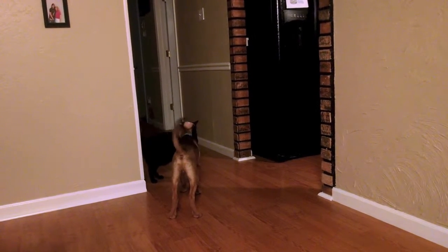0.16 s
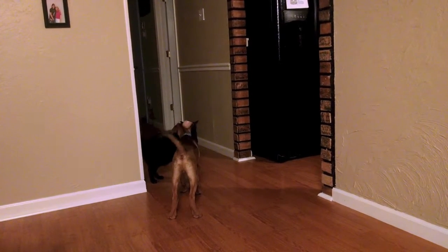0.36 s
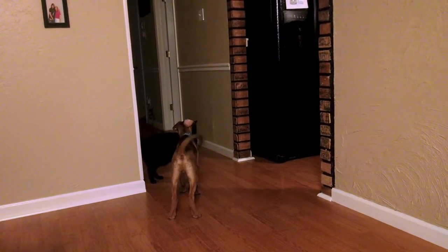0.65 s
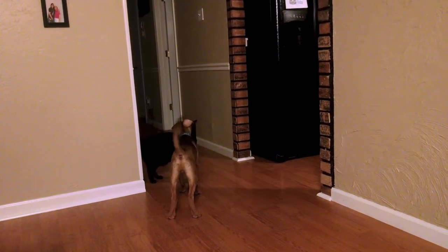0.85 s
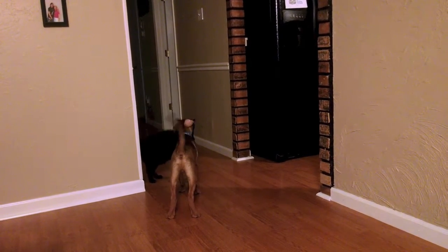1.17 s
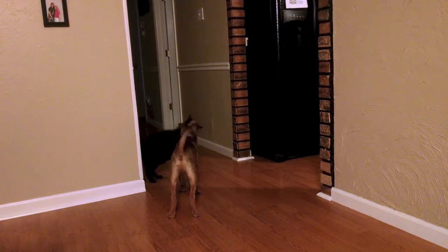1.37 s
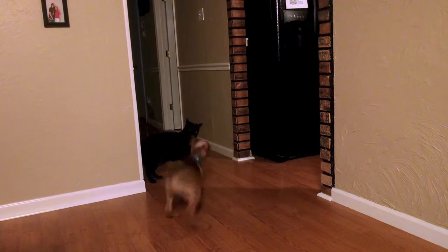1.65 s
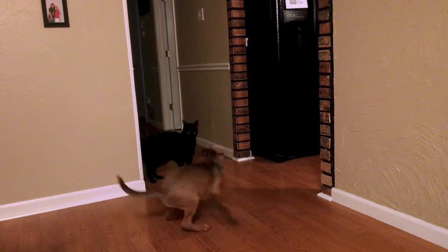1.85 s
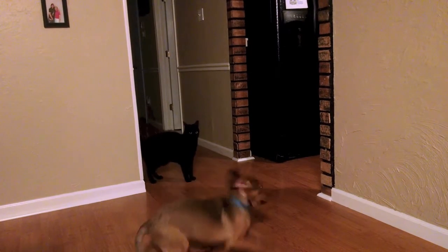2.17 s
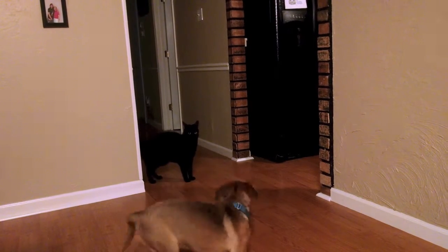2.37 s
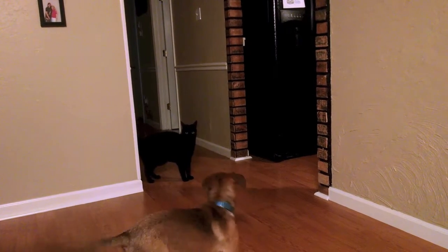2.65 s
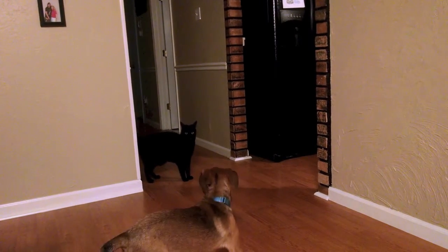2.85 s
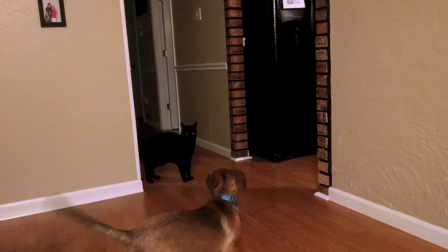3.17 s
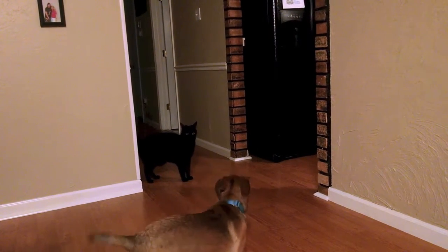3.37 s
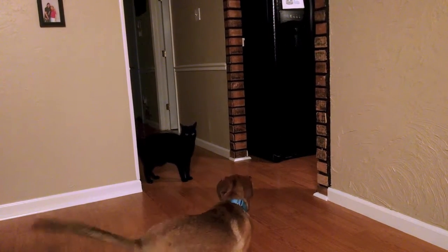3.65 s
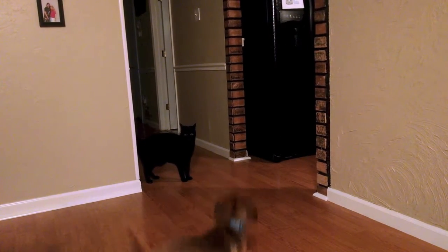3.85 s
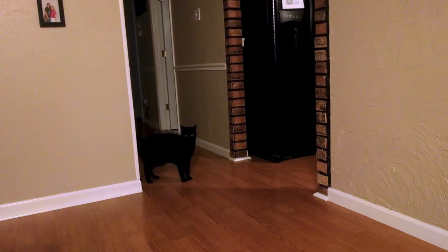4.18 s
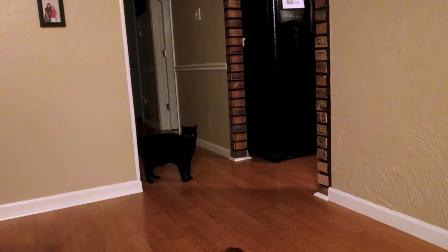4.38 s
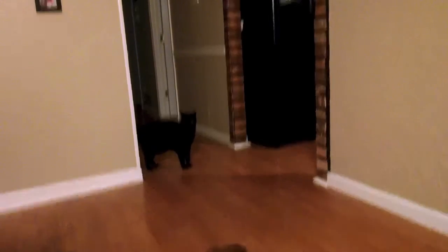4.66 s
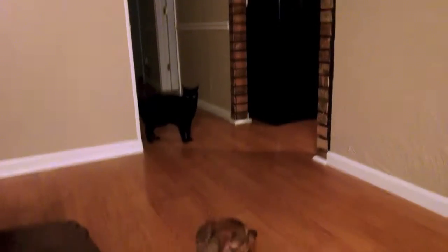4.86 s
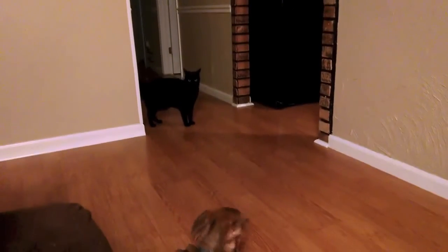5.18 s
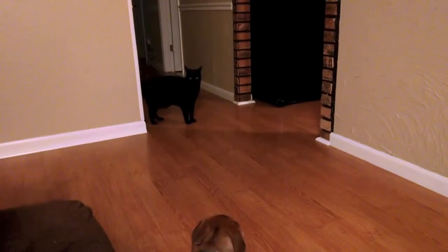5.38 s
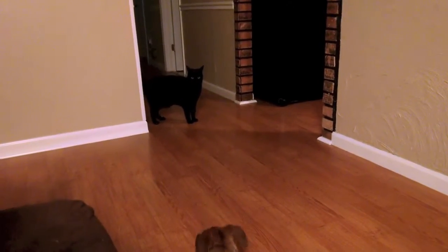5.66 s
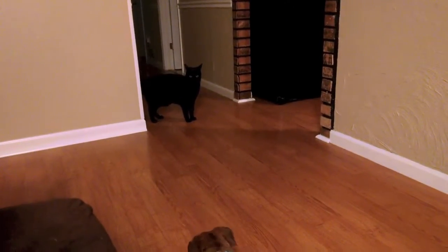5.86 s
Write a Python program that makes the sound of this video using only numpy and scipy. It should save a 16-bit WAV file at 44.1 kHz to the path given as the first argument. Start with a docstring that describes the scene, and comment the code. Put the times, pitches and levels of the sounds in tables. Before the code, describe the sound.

A puppy gives short yips and thin whimpers, a cat hisses once, and paws skid and thump on a hardwood floor.

```python
"""In a bare, lively room with a hardwood floor, a puppy yips and whistles through its nose at a cat.
The yips are short, rough tones shaped by its throat; the whistles are thin and very high. The cat
hisses once from the hall, pushing air and a hoarse buzz through its open mouth. Paws skid, claws tick
and the puppy's body thumps on the boards, while an appliance hums. A phone picks it all up through
two microphone ports (small holes) and steers them into a left and a right beam."""
import sys
import numpy as np
from scipy import signal
from scipy.fft import rfft, irfft, next_fast_len
from scipy.io import wavfile
from scipy.ndimage import map_coordinates

SR = 44100
rng = np.random.default_rng(int(sys.argv[2]) if len(sys.argv) > 2 else 0)


def store_wav(level_fs):
    """Save 16-bit WAV to argv[1]."""
    pcm = np.round(np.clip(np.atleast_2d(level_fs), -1, 1) * 32767)
    wavfile.write(sys.argv[1], SR, pcm.T.astype(np.int16))


N = 265046

# The puppy's yips. A peak_share of 0.3 means the swell tops out 30% of the way through.
# start_s, length_s, first_hz, last_hz, glide_s, level_db, peak_share, tilt_db_per_octave, roughness
PUPPY_YIPS = [(1.805, 0.027, 620, 620, .05, -46.5, 0.3, -21, 0.1),
              (1.848, 0.034, 575, 627, 0.023, -37, 0.38, -7.5, 0.27),
              (2.262, 0.04, 495.4, 510, 0.045, -34.5, .25, -11.5, 0.4),
              (2.3, 0.026, 654, 590, .05, -36, 0.12, -12, 0.44),
              (2.343, 0.036, 628, 655, .05, -44.5, 0.74, -22, .3),
              (2.555, 0.031, 399.6, 385, .05, -34.5, 0.49, -10.5, 0.27),
              (2.589, 0.039, 404.8, 412, .05, -38, 0.45, -18, 0.44),
              (3.156, 0.084, 821, 870, .05, -45.5, .05, -10, 0.26),
              (3.275, 0.05, 748, 586, .03, -48, 0.1, -16, .9),
              (3.477, 0.036, 731, 810, .025, -42, 0.5, -6.5, .5),
              (3.51, 0.029, 821, 852, .02, -36, .45, -11, 0.26),
              (3.546, 0.051, 794, 603, .05, -44, 0.25, -10, 0.61),
              (3.65, 0.065, 829, 856, .05, -54, 0.52, -20, 0.2),
              (3.836, 0.036, 771, 660, .025, -38.5, 0.58, -8.5, 0.46),
              (3.867, 0.029, 720, 834, .015, -33.5, .55, -9, .35),
              (3.897, .055, 850, 885, .04, -44.5, 0.43, -11, 0.78),
              (3.957, 0.0446, 1215, 1240, .05, -38.5, 0.3, -39, 0.18),
              (4.411, .052, 330, 660, .2, -35, .7, -5, .3), (4.46, 0.048, 649, 890, .035, -36, .65, -9, .4),
              (4.505, 0.085, 886, 955.5, .03, -27, 0.37, -15, .22),
              (4.604, 0.088, 819, 816, .05, -42.5, 0.17, -27, 0.47),
              (5.2, .047, 754, 925, 0.045, -37, 0.47, -6.5, .18),
              (5.243, 0.056, 914, 958, .015, -30, 0.38, -11.5, 0.23),
              (5.297, .026, 948, 1003, 0.02, -36, 0.68, -11, 0.48),
              (5.322, 0.031, 990, 845, .02, -33, .3, -6, .3),
              (5.35, 0.082, 844, 838.5, .015, -41, 0.3, -3.5, 0.11),
              (5.434, 0.066, 843.3, 843, .05, -34, 0.16, -6.5, 0.09),
              (5.53, 0.044, 830, 826.3, .05, -47.5, .4, -8.5, 0.01),
              (5.8, 0.044, 779, 805, 0.045, -38, 0.19, -18.5, 0),
              (5.852, 0.032, 820, 828, .05, -46, 0.72, -24, 0.36)]
# How the throat favours some overtones: frequency_hz, gain_db
THROAT_SHAPE = [(300, -1.5), (900, 4), (1700, -2), (2450, 11), (2850, 10.5), (3400, 10), (4200, 3),
                (5200, 3), (5850, 14), (6600, 4), (10000, -22)]
# Nose whistles: start_s, length_s, first_hz, last_hz, glide_s, level_db, peak_share, octave_gain_db
NOSE_WHISTLES = [(2.322, 0.087, 6200, 6080, .02, -32.5, 0.079, -22),
                 (3.195, 0.026, 6130, 6100, .02, -53, 0.77, -28),
                 (3.224, 0.09, 6040, 5900, .03, -52, .55, -9),
                 (3.901, 0.032, 5720, 5400, .014, -27, 0.39, -29),
                 (3.93, 0.061, 5354, 5410, .03, -25, 0.65, -29),
                 (3.979, 0.1, 5660, 5540, .09, -24, 0.45, -27),
                 (4.524, 0.027, 6530, 6650, .015, -36, 0.81, -23),
                 (4.589, 0.018, 6690, 6680, .03, -36, 0.4, -31),
                 (4.6, 0.036, 6650, 5780, .016, -30.5, 0.45, -31),
                 (4.643, 0.078, 5740, 5700, .02, -30, 0.49, -15.5),
                 (4.724, 0.16, 5930, 6095, 0.033, -42, 0.33, -26),
                 (5.278, 0.065, 6600, 6540, .008, -22, 0.25, -27),
                 (5.335, .095, 6545, 6530, .03, -31, 0.1, -27.5)]
# The puffs that make up one hiss. The last three columns are relative to the main band near 2.3 kHz.
# start_s, length_s, pitch_hz, level_db, peak_share, low_db, mid_db, high_db
HISS_PUFFS = [(1.093, 0.076, 462.4, -67.5, 0.55, 15, -3, 1), (1.141, 0.052, 440, -44, 0.4, -5, 0.5, -2),
              (1.174, 0.0668, 444.8, -36, 0.76, -15.5, -5, -8.5),
              (1.226, 0.079, 472.6, -34, 0.51, -17, -9, -9.5), (1.302, 0.075, 460, -48, 0.28, -4.5, -6, -2),
              (1.409, 0.083, 471, -42.5, .6, -9, -1, 1.5), (1.468, 0.051, 476, -47, 0.63, -5, -2, 5),
              (1.511, 0.063, 452, -45.5, 0.26, 1, 3.5, -3), (1.566, .075, 440, -59, 0.45, 13, -4, 3)]
# Where the cat's open mouth rings at a pitch of 462 Hz: frequency_hz, width_hz, gain_db
MOUTH_RESONANCES = [(955, 93, 3), (1376, 160, 9.5), (1926, 127, 10.5), (2213, 108, 18), (2836, 95, 17),
                    (3220, 300, 9.5), (4180, 500, -2)]
# Pads and fur sliding on wood, rising 30 dB in rise_s and falling 60 dB in fall_s:
# peak_s, rise_s, fizz_db, fall_s, rub_over_fizz_db
PAW_SKIDS = [(1.446, 0.44, -56.5, 4, -3), (1.572, 0.07, -42.5, 0.57, -1), (1.695, 0.008, -24, 0.02, -7.5),
             (1.71, 0.17, -43, 0.5, -16), (1.835, 0.24, -49, 0, -6), (1.88, 0.1648, -39.5, 0.03, -10.5),
             (1.915, 0.14, -38, 0, -20), (2.0, 0.16, -44, 0.1, -9.5), (2.035, 0.3, -44, 0.2, -25),
             (2.081, 0, -38.5, 0.1, 1.5), (2.116, 0.01, -33, 0.25, -11.5), (2.159, 0.03, -36, 0.38, -5.5),
             (2.2, 0.12, -38.5, 0.54, -25), (2.26, 0.09, -41, 0.47, -5), (2.345, 0.17, -43, 0.17, -6),
             (2.487, 0.08, -33, 0.09, -29), (2.49, 0.17, -41.5, 0.78, -7.5), (3.2, 0.2, -55, 0.8, -6),
             (3.29, 0.3, -55, 0.3, -2.5), (3.474, 0.06, -49, 0.6, -6), (3.54, 0.06, -47.5, 0.16, -24),
             (3.62, -0.01, -47, 0.23, -11), (3.842, 0.008, -50, 0.6, -6), (3.905, 0.08, -44, 0.5, -4),
             (3.978, 0.07, -38.5, 0.1, -24), (4.1, 0.0515, -23.5, .5, -18),
             (4.175, 0.23, -26, -0.02, -22.5), (4.395, 0.04, -50, 0.6, -4.5), (4.53, 0.3, -41, 0.3, -12),
             (4.557, 0, -36, 0.45, -9), (4.68, 0.3, -45, .45, -17), (4.8, 0.3, -54, .25, -17),
             (5.215, 0.02, -50, 0.6, -12), (5.34, 0.25, -46, 0.35, -12), (5.43, .2, -44, 0.16, -8.5),
             (5.808, 0.008, -56, 0.9, -2), (6.0, 0.45, -49, 3, -7)]
# A skid's bright fizz and its lower rub: frequency_hz, level_db
FIZZ_SHAPE = [(1500, -138), (3000, -2), (4500, 0.5), (7000, 3), (10000, -5), (13000, -9.5), (16000, -17)]
RUB_SHAPE = [(40, -28), (100, -1), (300, -8), (1000, -4.5), (2500, -3.5), (5000, -15.5), (9000, -24)]
# Nails striking the floor: start_s, level_db, ring_db (near 6.5 kHz)
CLAW_TICKS = [(1.433, -36, 8), (1.5703, -30, 9), (1.6894, -1.5, 12), (1.8295, -33, 5), (1.853, -29, 2),
              (1.882, -27, -1), (1.912, -22, 9), (1.997, -23, 0), (2.0777, -24, 3), (2.081, -25, 0),
              (2.109, -20, -6), (2.1102, -12, -6), (2.113, -22, 4.5), (2.1245, -26, 11), (2.152, -17, 7),
              (2.157, -21, 9), (2.1595, -21, 2), (2.1635, -23, 2), (2.323, -32, 0), (2.483, -22, -2),
              (2.492, -24, 3), (3.461, -43, 0), (3.8373, -52, 5), (3.8693, -40, 3), (3.904, -24.5, 5),
              (4.089, -13, 11), (4.105, -8.5, 12), (4.549, -22, 0), (4.555, -18, -3), (4.561, -21, 0),
              (5.418, -27, -2), (5.807, -36, -4)]
# The body hitting the floor: start_s, level_db, boom_db, softness, decay_s (to fall 60 dB)
BODY_THUMPS = [(1.601, -39.5, -10, 1.5, 0.088), (1.648, -30.5, -16.5, 1.46, 0.047),
               (1.689, -33, -15, 0.53, 0.022), (2.074, -31, -39, 0.6, 0.1), (2.099, -39, -10, 2.6, 0.069),
               (2.152, -33.5, -15, 0.2, 0.076), (2.189, -34, 8, 0.89, 0.022), (2.218, -48, -17, 1.3, 0.13),
               (2.268, -30, -36.5, 0.3, 0.09), (2.306, -40, 6, 0.51, 0.027), (2.458, -39.5, 0, 1.3, 0.065),
               (2.486, -46, 1.5, 1.24, 0.039), (2.541, -32, -17, 0.35, 0.044),
               (2.58, -35.5, -10, 1.9, 0.043), (3.34, -39, 11, 2.8, 0.073), (3.549, -41.5, -13, 1.2, 0.07),
               (4.063, -35, -33, 0.34, 0.05), (4.077, -19, -40, 1.67, 0.058), (4.096, -28, -30, 3.2, 0.084),
               (4.128, -34, -26, 2.4, 0.05), (4.378, -21.5, -21, 1.1, 0.098), (4.421, -35, -35, 0.91, 0.11),
               (5.354, -25, -39, 1.6, 0.032), (5.366, -26, -30, 3.2, 0.09), (5.399, -41, -14, 1.9, 0.046),
               (5.664, -43.5, -11, 0.98, 0.058)]
# Where the floorboards ring: frequency_hz, width_hz, gain_db
BOARD_RESONANCES = [(152, 60, 1.5), (254, 63, -3), (460, 214, -4.5), (920, 620, -33)]
# The appliance's tones: pitch_hz, width_hz, level_db
HUM_TONES = [(121.23, 4.7, -75), (244.67, 8.4, -67), (381.5, 25, -78)]
# How the hum grows louder: time_s, gain_db
HUM_RISE = [(0, 8.5), (1.5, 13.5), (3, 15.5), (4.5, 16.5), (6, 17.5)]
# The room's soft background noise: frequency_hz, level_db
AIR_SHAPE = [(15, -71), (25, -16), (53, -4.5), (87, -18), (114, -6), (212, -8.5), (249, -0.5), (277, -10),
             (394, -10.5), (451, -10), (641, -17.5), (1020, -19.5), (3250, -27), (16000, -36)]
# How long the room rings: frequency_hz, decay_s (to fall 60 dB)
ROOM_DECAY = [(100, 0.43), (1000, 0.39), (5000, 0.38), (14000, 0.12)]
# How much louder the left port is than the right: frequency_hz, difference_db
PORT_BALANCE = [(60, 2), (250, 1.5), (4500, -1.5), (5800, 5.5), (7500, 0.5), (10000, -10.5), (13000, -10.5),
                (16000, -14)]
# How much of the other port each beam takes away: frequency_hz, share
BEAM_SHARE = [(100, 0.8), (3000, 0.75), (4500, 0.18), (8000, 0.37), (11000, 0.03), (15000, 0.18)]

PORT_S = 16 / SR  # time sound takes to travel between the ports


def puppy_yips():
    """The voice makes ten overtones on an unsteady pitch; the throat shapes them, breath blurs them."""
    out = np.zeros(N)
    dulling_db, flutter_size_db = 5, 3.5  # brightness lost per octave by the end; tremble in level
    for start, length, first_hz, last_hz, glide_s, db, peak, tilt_db, rough in PUPPY_YIPS:
        progress, gate = span(length, fade_s=0.0035)
        size = len(progress)
        hz = glide(progress, length, first_hz, last_hz, glide_s)
        jitter = .07 * rough * wobble(140, size)
        phase = phase_of(hz * (1 + jitter))
        tone = np.zeros(size)
        for k in range(1, 11):
            rolloff_db = (tilt_db - dulling_db * progress) * np.log2(k)
            throat_db = along(THROAT_SHAPE, k * hz) - along(THROAT_SHAPE, hz)
            shimmer_db = 11 * rough * wobble(170, size)
            tone += amp(rolloff_db + throat_db + shimmer_db) * np.sin(k * phase)
        breath = amp(-17) * rough * (1 + np.cos(phase)) * rng.standard_normal(size)
        flutter_db = flutter_size_db * wobble(37.4, size)
        level_db = db + arch(progress, peak, swell_db=9.5, sag_db=13) + flutter_db - flutter_db.mean()
        add(out, start, gate * amp(level_db) * (tone + breath))
    return out


def nose_whistles():
    """Air through the nose makes a thin, wavering tone and its octave, with breath rushing round it."""
    out = np.zeros(N)
    for start, length, first_hz, last_hz, glide_s, db, peak, octave_db in NOSE_WHISTLES:
        progress, gate = span(length, fade_s=0.0025)
        size = len(progress)
        hz = glide(progress, length, first_hz, last_hz, glide_s)
        jitter = .005 * wobble(70, size) + .004 * wobble(250, size)
        phase = phase_of(hz * (1 + jitter))
        level = amp(db + arch(progress, peak, swell_db=0.5, sag_db=16.5) + 3.2 * wobble(90, size))
        breath = amp(-10) * wobble(1400, size)
        tone = (1 + breath) * np.sin(phase) + amp(octave_db) * np.sin(2 * phase)
        add(out, start, gate * level * tone)
    return out


def cat_hiss():
    """Rushing air and a hoarse buzz ring in the mouth; the moving jaw colours each puff differently."""
    out = np.zeros(N)
    mouth, broad = resonances(MOUTH_RESONANCES), resonances([(2200, 7700, 0.22)])
    below = lambda f, edge_hz: 1 / (1 + (f / edge_hz) ** 16)
    bands = lambda f: [below(f, 1720), below(f, 2160) - below(f, 1700),
                       below(f, 2940) - below(f, 2200), 1 - below(f, 3010)]
    for start, length, hz, db, peak, low_db, mid_db, high_db in HISS_PUFFS:
        progress, gate = span(length, fade_s=0.013)
        size = len(progress)
        phase = phase_of(hz * (1 + .02 * wobble(90, size)))
        buzz = unit(sum(amp(3 * wobble(120, size)) * np.sin(k * phase) for k in range(3, 8)))
        rush = amp(2.2 * wobble(150, size)) * rng.standard_normal(size)
        tilt_db = -14 * (start - HISS_PUFFS[0][0])  # per octave: each band darkens as the jaw closes
        darken = lambda f: amp(tilt_db * np.log2(f / 2000 + .1)) / (1 + (f / 6000) ** 8)
        colour = lambda f: (mouth(f * 462 / hz) + broad(f)) * darken(f)  # ringing follows the pitch
        low, mid, main, high = filtered(rush + amp(-10) * buzz, lambda f: colour(f) * bands(f))
        puff = unit(main) + amp(low_db) * unit(low) + amp(mid_db) * unit(mid) + amp(high_db) * unit(high)
        level = amp(db + arch(progress, peak, swell_db=7, sag_db=15))
        add(out, start, gate * level * puff)
    return out


def paw_skids():
    """Pads and fur drag over the boards, making grainy noise that swells and dies away."""
    out, t = np.zeros(N), np.arange(0, N, 16) / SR
    peak_s, rise_s, fizz_db, fall_s, rub_db = np.transpose(PAW_SKIDS)[..., None]
    drag_db = fizz_db + np.minimum(30 * (t - peak_s) / abs(rise_s), -60 * (t - peak_s) / abs(fall_s))
    for shape, db in ((FIZZ_SHAPE, drag_db), (RUB_SHAPE, drag_db + rub_db)):
        all_skids = np.linalg.norm(amp(db), axis=0)
        level = np.interp(np.arange(N) / SR, t, all_skids)
        grain = amp(2.2 * wobble(300, N) + 1.2 * wobble(40, N)) * rng.standard_normal(N)
        out += level * unit(filtered(grain, lambda f: amp(along(shape, f))))
    return out


def claw_ticks():
    """Each nail digs in and lets go with a bright crack."""
    out, t = np.zeros(N), np.arange(SR // 20) / SR
    decay_s = 0.0042
    for start, db, ring_db in CLAW_TICKS:
        nail = resonances([(4040, 3000, 0.61), (6520, 1350, ring_db),
                           (9800, 6000, 1.9), (12400, 4000, 0.5)])
        scratch = rng.standard_normal(len(t)) * t * amp(-60 * t / decay_s)
        scratch[0] = 1.2 * np.linalg.norm(scratch)  # the nail's first tap
        crack = filtered(scratch, lambda f: nail(f) * 1j * f / (1500 + 1j * f))
        add(out, start, amp(db) * crack / np.abs(crack).max())
    return out


def body_thumps():
    """A blow and a soft puff of noise shake the floorboards and the joists that hold them up."""
    out, t = np.zeros(N), np.arange(SR // 4) / SR
    for start, db, boom_db, softness, decay_s in BODY_THUMPS:
        puff = rng.standard_normal(len(t)) * amp(-60 * t / abs(decay_s))
        puff[0] = 0.79 * np.linalg.norm(puff)  # the opening blow
        joists = (56, 35, 12 + boom_db)
        floor = resonances([joists, *BOARD_RESONANCES])
        thud = filtered(puff, lambda f: floor(f) / (1 + 1j * f / 250) ** softness)  # soft pads dull it
        add(out, start, amp(db) * thud / np.abs(thud).max())
    return out


def appliance_hum():
    """Three narrow bands of noise make a low, wavering hum that slowly grows."""
    hum = np.zeros((2, N))
    for hz, width_hz, db in HUM_TONES:
        ring = resonances([(hz, width_hz, 0)])
        hum += amp(db) * unit(filtered(rng.standard_normal((2, N)), lambda f: ring(f) ** 2))
    rise_db = np.interp(np.arange(N) / SR, *np.transpose(HUM_RISE))
    return amp(rise_db) * hum


def room_air():
    """A soft, low rush of air whose level drifts a little."""
    air = unit(filtered(rng.standard_normal((2, N)), lambda f: amp(along(AIR_SHAPE, f))))
    return amp(-51 + 0.84 * wobble(2.2, N)) * air


def in_room(x, lag, reverb_db):
    """x reaches the left port lag * PORT_S after the right, with a wall echo and the room's ringing."""
    hz, t, noise = signal.stft(rng.standard_normal((2, SR * 3 // 4)), SR, nperseg=256)
    fade = amp(-60 * t / along(ROOM_DECAY, hz)[:, None])
    tail = signal.istft(noise * fade, SR, nperseg=256)[1]
    tail = from_all_sides(np.pad(tail, ((0, 0), (200, 0))))
    reverb = signal.fftconvolve(x[None], tail / np.linalg.norm(tail[0]), axes=1)[:, :N]
    side = np.array([[1], [-1]])  # left, right
    wall_echo = lambda f: 1 + .28 * delay(f, .0033)
    direct = filtered(x, lambda f: delay(f, side * lag * PORT_S / 2) * wall_echo(f))
    balance = lambda f: amp(along(PORT_BALANCE, f) * (side - .6) / 2)
    return filtered(direct + amp(reverb_db) * reverb, balance)


def from_all_sides(pair):
    """Blends two unrelated signals as the ports hear sound from all round: most alike in the bass."""
    angle = lambda f: np.arccos(np.sinc(2 * f * PORT_S)) / 2
    mid, side = filtered(pair, lambda f: np.array([np.cos(angle(f)), np.sin(angle(f))]))
    return np.array([mid + side, mid - side])


def span(length, fade_s):
    """Progress from 0 to 1 through a call, and a gate that fades it in and out."""
    progress = np.arange(round(length * SR)) / (length * SR)
    return progress, np.clip(np.minimum(progress, 1 - progress) * length / fade_s, 0, 1)


def arch(progress, peak, swell_db, sag_db):
    """A level in dB that swells to 0 at the peak and sags after it."""
    return np.interp(progress, [0, np.clip(peak, .01, .99), 1], [-swell_db, 0, -sag_db])


def glide(progress, length, first_hz, last_hz, glide_s):
    """A pitch that leaves its first value and settles on the last."""
    to_go = np.exp(-(progress * length / glide_s) ** 1.6)
    return last_hz + (first_hz - last_hz) * (to_go - to_go[-1]) / (1 - to_go[-1])


def phase_of(hz):
    """The running angle of a wave whose pitch changes."""
    return 2 * np.pi * np.cumsum(hz) / SR


def wobble(rate, size):
    """A smooth random curve through rate points a second."""
    return map_coordinates(rng.standard_normal(int(size * rate / SR) + 4), [np.arange(size) * rate / SR])


def resonances(table):
    """A filter that rings at each row of frequency_hz, width_hz, gain_db."""
    return lambda f: sum((-1) ** k * amp(db) * 1j * f * width / (hz * hz - f * f + 1j * f * width)
                         for k, (hz, width, db) in enumerate(table))


def delay(f, seconds):
    """A filter that makes a sound arrive later."""
    return np.exp(-2j * np.pi * f * seconds)


def filtered(x, response):
    """Multiplies each frequency f in x by response(f)."""
    size = next_fast_len(x.shape[-1] + SR // 2)
    return irfft(rfft(x, size) * response(np.fft.rfftfreq(size, 1 / SR)), size)[..., :x.shape[-1]]


def along(points, hz):
    """Reads between the rows of a frequency table, with octaves evenly spaced."""
    frequencies, values = np.transpose(points)
    return np.interp(np.log(hz + 1), np.log(frequencies + 1), values)


def amp(db):
    """Turns decibels into a multiplier."""
    return 10 ** (np.asarray(db) / 20)


def unit(x):
    """Scales x to an average power of 1."""
    return x / np.sqrt(np.mean(np.abs(x) ** 2) + 1e-20)


def add(track, start_s, x):
    """Mixes x into the track at start_s."""
    part = track[round(start_s * SR):][:len(x)]
    part += x[:len(part)]


def scene():
    """Everything as it reaches the two ports."""
    cat = in_room(cat_hiss(), lag=0.22, reverb_db=1.5)
    thumps = amp(1.5) * in_room(body_thumps(), lag=0.23, reverb_db=-4)
    claws = in_room(claw_ticks(), lag=0.763, reverb_db=-11.5)
    yips = in_room(puppy_yips(), lag=0.11, reverb_db=-3.5)
    whistles = in_room(nose_whistles(), lag=0.11, reverb_db=-4)
    skids = in_room(paw_skids(), lag=0.608, reverb_db=-2)
    background = from_all_sides(room_air() + appliance_hum())
    return yips + whistles + cat + skids + claws + thumps + background


def record(dry):
    """Each beam is one port minus the delayed other; the lost bass is lifted and the very top cut."""
    top_hz = 15800
    other_port = filtered(dry[::-1], lambda f: along(BEAM_SHARE, f) * delay(f, PORT_S))
    bass_lift = lambda f: (1j * f + 900) / (1j * f + 200)
    return filtered(dry - other_port, lambda f: 0.89 * bass_lift(f) * (f < top_hz))


dry = scene()
out = record(dry)
store_wav(out)
```